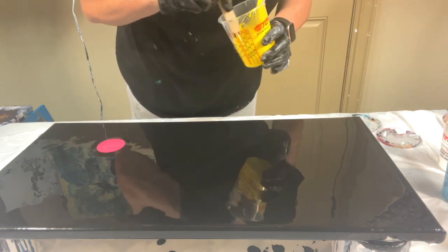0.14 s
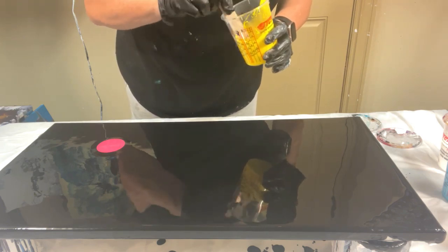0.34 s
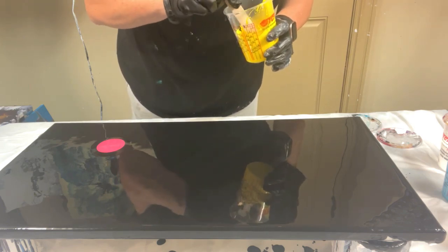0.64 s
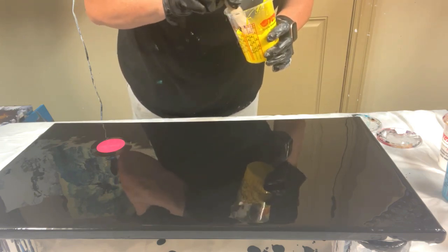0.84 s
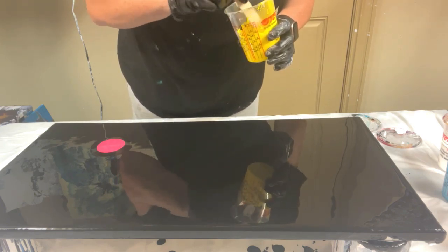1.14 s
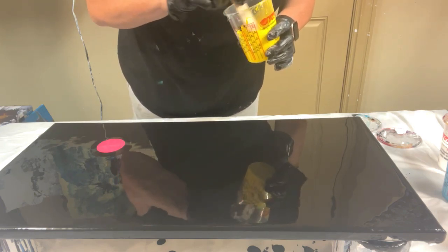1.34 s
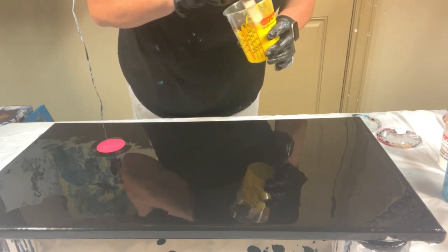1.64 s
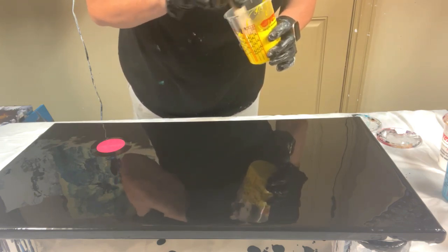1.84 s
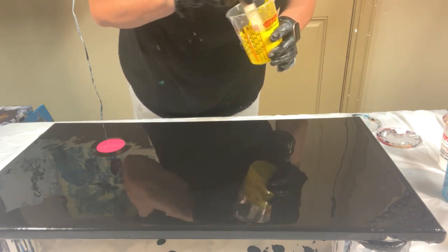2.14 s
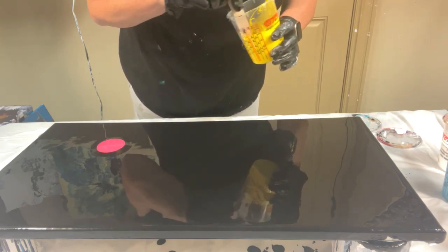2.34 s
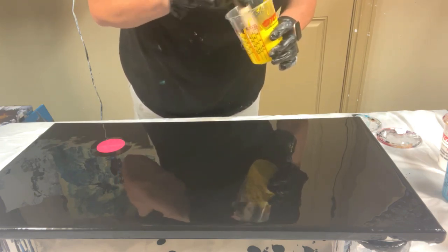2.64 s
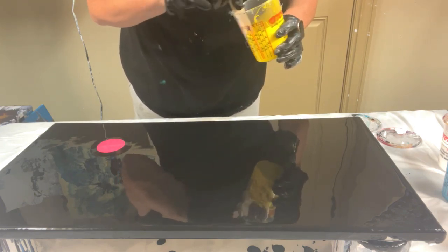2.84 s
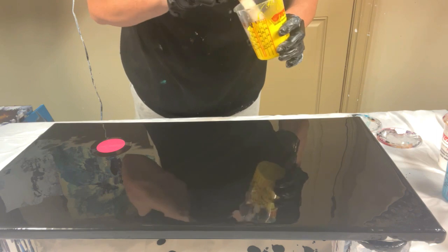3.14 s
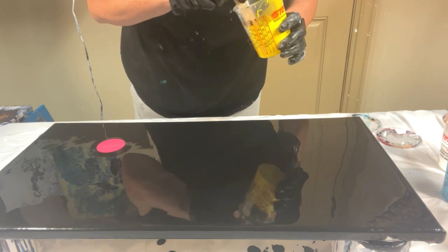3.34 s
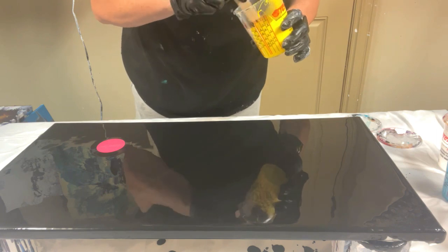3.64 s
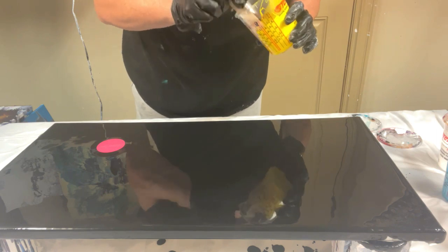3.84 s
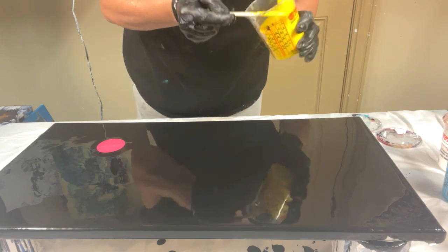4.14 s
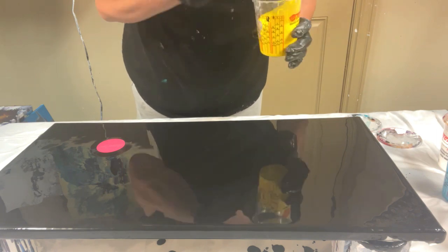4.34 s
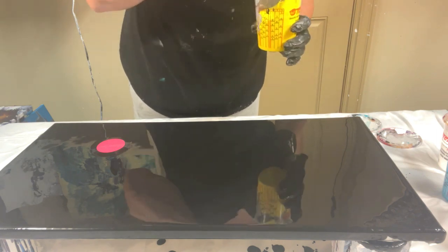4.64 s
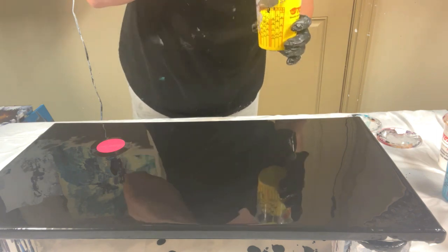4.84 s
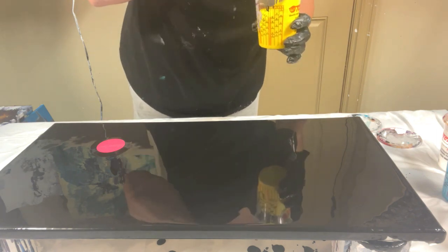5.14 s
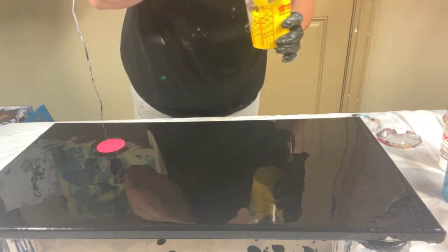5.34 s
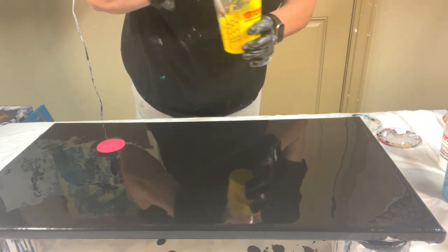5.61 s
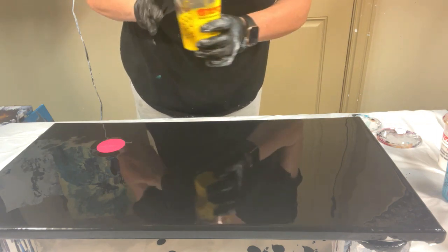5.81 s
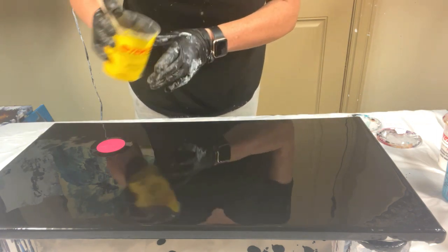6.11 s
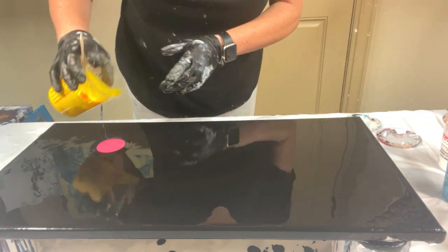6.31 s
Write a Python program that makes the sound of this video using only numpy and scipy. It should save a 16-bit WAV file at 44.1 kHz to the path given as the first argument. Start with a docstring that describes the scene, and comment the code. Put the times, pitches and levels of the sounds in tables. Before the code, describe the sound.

A steady low mains-like hum and deep ventilation rumble, with a faint rush of air stronger on the left, continue throughout. From 0 s a wooden stick stirs thin paint in a hand-held plastic cup, a little left of centre. Light, irregular knocks come a few times a second: damped thuds, a hollow ring and small woody clicks, often doubled by a soft rebound. Faint rubbing, short scrapes and tiny wet crackles fill the gaps. Knocks thin slightly around 2.4 to 3 s, then gather into a firmer, fuller cluster at 3.5 to 3.9 s. A last soft drag comes near 4.2 s, then only hum and air remain. At 5.4 s a scrape and knock resume; at 5.6 s rapid clatter and a bright rim scrape follow, then another scrape and a sharp hollow rattle around 5.9 to 6 s. A small room adds a short bounce and diffuse tail; the treble is softened.

```python
"""Stirring paint in a plastic cup

A wooden stick stirs thin paint in a hand-held cup: knocks ring the cup, stick-slip clicks make the scrapes.
The stick rests for a second, then clatters and scrapes at the rim as the cup changes hands.
Bursting paint films crackle, and a small room echoes it all with a bounce and a tail of fading noise.
Sine tones make a motor hum throughout; shaped noise makes the rumble and hiss of ventilation."""
import sys
import numpy as np
from scipy import signal
from scipy.fft import rfft, irfft
from scipy.io import wavfile
from scipy.ndimage import uniform_filter1d

SR = 44100
rng = np.random.default_rng(int(sys.argv[2]) if len(sys.argv) > 2 else 0)


def store_wav(level_fs):
    """Save 16-bit WAV to argv[1]."""
    pcm = np.round(np.clip(np.atleast_2d(level_fs), -1, 1) * 32767)
    wavfile.write(sys.argv[1], SR, pcm.T.astype(np.int16))


N = 285503
TIME = np.arange(N) / SR
BLOW_TIME = TIME[:SR // 6]  # the time span of one blow

# Firm knocks of the stick; levels are before the trims in knocks(). The hollow's pitch starts at
# hollow_pitch_hz where 880 is its rest; the wall answers best at wall_centre_hz and less to either side.
# [start_s, base_thud_db, hollow_ring_db, hollow_pitch_hz, wall_db, wall_centre_hz,
#  wall_falloff_db_per_octave, tick_db, tick_centre_hz]
STICK_KNOCKS = [(0.2055, -70, -61, 893, -69.5, 2190, 10, -75, 3000),
                (0.302, -64.5, -72, 880, -85, 1400, 18, -90, 3000),
                (0.346, -67, -69.5, 823, -72.5, 2400, 24, -78, 3200),
                (0.5605, -67, -65.5, 884, -69, 1250, 10, -70, 3200),
                (0.6832, -75, -80, 876, -60.5, 2080, 30, -65, 4400),
                (0.694, -64, -66, 890, -59, 2260, 12, -62, 3400),
                (0.795, -66, -79, 880, -75, 1300, 20, -80, 3000),
                (0.84, -72, -69, 850, -86, 2400, 18, -84, 3000),
                (0.9385, -82, -75, 890, -66.5, 2500, 30, -65.5, 3500),
                (1.0128, -69, -60, 900, -62, 1320, 18, -67.5, 4000),
                (1.029, -65, -87, 880, -71, 2880, 19, -64.5, 4700),
                (1.055, -80, -81, 906, -72, 2350, 23, -70, 4700),
                (1.1685, -73, -67.5, 870, -71.5, 2550, 4, -67, 3370),
                (1.2888, -64, -72, 871, -74, 1900, 19, -71, 4500),
                (1.4218, -56.5, -65.5, 906, -66.5, 2630, 23, -62.5, 3730),
                (1.435, -67, -59.5, 900, -67, 2700, 28, -76, 3400),
                (1.463, -78, -78, 875, -76, 2400, 18, -79, 3200),
                (1.4995, -82, -66, 878, -68.5, 2300, 12, -73, 3400),
                (1.693, -72, -68, 889, -58, 2300, 7, -72, 3600),
                (1.701, -76, -58.5, 890, -61.5, 2420, 23, -60, 5000),
                (1.762, -78, -75, 874, -68.5, 2300, 16, -73, 4800),
                (1.8134, -88, -79, 870, -74, 2300, 20, -70, 4540),
                (1.9574, -75, -64, 900, -68, 2300, 20, -69.5, 6500),
                (2.0242, -74, -79, 910, -67.5, 2420, 34, -71, 3600),
                (2.0778, -86, -80, 885, -66, 2450, 39, -69.5, 4000),
                (2.131, -90, -69, 875, -83, 2300, 18, -86, 3500),
                (2.2302, -82, -64.5, 885, -60.5, 2100, 19, -67, 3200),
                (2.2938, -63, -69, 830, -68.5, 2360, 28, -87, 3500),
                (2.5627, -82, -89, 860, -76, 2360, 22, -76, 3500),
                (2.7557, -68, -60.5, 890, -65, 2320, 18, -67.5, 4060),
                (2.945, -80, -69, 845, -82, 2200, 18, -78, 4000),
                (3.0466, -68, -86, 870, -69, 2200, 20, -76, 3200),
                (3.1752, -82, -62.5, 845, -66, 2530, 10, -62, 5100),
                (3.249, -66, -62, 865, -77, 1500, 18, -93, 3000),
                (3.4798, -62, -66, 900, -62, 1780, 19, -60, 3100),
                (3.5218, -63, -65, 881, -64, 1650, 8, -73, 3000),
                (3.5665, -57, -59.5, 883, -62.5, 1580, 18, -69, 3600),
                (3.579, -67, -54.5, 880, -76, 1660, 20, -79, 3600),
                (3.7412, -64.5, -66, 926, -63.5, 1790, 12, -59.5, 3500),
                (3.815, -76, -77, 890, -70, 1610, 25, -70, 4900),
                (3.835, -59, -53.5, 888, -67.5, 1690, 22, -73, 4020),
                (3.848, -58, -53.5, 877, -70, 1640, 27, -73, 4000),
                (3.893, -71, -66, 890, -77, 1410, 18, -72, 4000),
                (3.926, -81, -69, 855, -68, 1380, 30, -72.5, 3600),
                (4.0345, -68.5, -82, 917, -68.5, 1400, 8, -66, 4430),
                (4.0626, -68, -71, 890, -72, 2170, 18, -68.5, 3800),
                (5.4012, -60, -71, 900, -57.5, 1630, 21, -60, 3740),
                (5.434, -65, -77, 880, -65.5, 1950, 20, -70, 3600),
                (5.5148, -69, -62.5, 880, -62, 1880, 27, -65, 3830),
                (5.528, -77, -68, 886, -76, 1900, 18, -78, 3600),
                (5.5655, -65, -75, 870, -64.5, 1400, 15, -79, 3600),
                (5.586, -80, -68, 885, -78, 1500, 8, -77, 3600),
                (5.6222, -80, -86, 880, -74, 2000, 13, -63, 7000),
                (5.6262, -74, -81, 884, -65, 1960, 34, -75, 6700),
                (5.631, -79, -80, 870, -66, 1980, 36, -69, 6300),
                (5.6408, -72, -79, 870, -65, 1980, 33, -69, 6630),
                (5.9435, -79, -76, 870, -67, 2310, 8, -68.5, 3800),
                (5.966, -91, -84, 880, -69, 3000, 17, -65, 5160),
                (5.978, -66.5, -59, 844, -69, 1620, 13, -71, 4000),
                (5.992, -70, -52.5, 881, -59.5, 2150, 11, -56, 6100),
                (6.008, -76, -70, 880, -63, 2200, 14, -67, 3800)]


def knocks(base_trim_db=-1, hollow_trim_db=0., wall_trim_db=0., tick_trim_db=-1):
    """The stick strikes the cup, springs back and touches it once more, softly."""
    out = np.zeros(N)
    # delay in seconds, then change in the hollow and in everything else in dB
    touches = [(0, 0, 0), (.0113, -7, -14.5)]
    for start_s, base, hollow, hollow_hz, wall, wall_hz, falloff_db, tick, tick_hz in STICK_KNOCKS:
        for lag_s, air_db, plastic_db in touches:
            base_db = base + base_trim_db + plastic_db
            hollow_db = hollow + hollow_trim_db + air_db
            wall_db = wall + wall_trim_db + plastic_db
            tick_db = tick + tick_trim_db + plastic_db
            touch_s = start_s + lag_s
            add(out, touch_s, body(base_db, hollow_db, hollow_hz))
            add(out, touch_s, blow(wall_ring(wall_hz, falloff_db), wall_db))
            add(out, touch_s, blow(contact(tick_hz), tick_db))
    return out


# Ways the paint-loaded base can ring, damped by paint and hand; levels are relative.
# [pitch_hz, level_db, time_to_fall_60_db_s]
BASE_MODES = [(313, -6.5, 0.039), (440, 0, 0.019), (545, -3.5, 0.039), (688, 4.5, 0.016),
              (640, -12.5, 0.024)]
# Ways the air in the cup can ring; levels are relative.
# [pitch_hz, level_db, time_to_fall_60_db_s]
HOLLOW_MODES = [(740, -15, .04), (826, -3.5, .06), (875, 3, .026), (893, -5.5, .105), (935, -6, .045),
                (990, -10, .035), (1080, -10, .02)]


def body(base_db, hollow_db, hollow_hz, rest_hz=880, cushion_s=0.003):
    """The paint passes a knock on: the base thuds and the hollow sounds, its pitch bent by the sloshing."""
    cushion = 1 - np.exp(-BLOW_TIME / cushion_s)
    thud = ring(BASE_MODES, scatter_db=2, detune=.03)
    bend = hollow_hz / rest_hz - 1
    air = ring(HOLLOW_MODES, scatter_db=2, detune=.012, signs=[1], bend=bend)
    return blow(cushion * thud, base_db) + blow(cushion * air, hollow_db)


# Ways the thin plastic wall can ring, damped by the hand; levels are relative.
# [pitch_hz, level_db, time_to_fall_60_db_s]
WALL_MODES = [(1083, 9, 0.022), (1241, 7, 0.015), (1435, -3, 0.019), (1702, 1, 0.016), (1808, 0.5, 0.011),
              (1906, 4.5, 0.017), (2033, -1.5, 0.013), (2263, 3, 0.026), (2400, 0, 0.023),
              (2640, -3.5, 0.029), (2800, 2.5, 0.012), (3200, -2, 0.0045), (3470, -12, 0.0061),
              (4030, -4.5, 0.019), (4550, -4, 0.019)]


def wall_ring(centre_hz, falloff_db, press_s=0.00061):
    """The place of contact favours the wall modes around one frequency; the grip flexes and retunes them."""
    modes = [(hz, db - falloff_db * abs(np.log2(hz / centre_hz)), t60) for hz, db, t60 in WALL_MODES]
    press = 1 - np.exp(-BLOW_TIME / press_s)  # the wall yields, so the force builds up
    return press * ring(modes, scatter_db=2, detune=.04)


# Colour of wood touching plastic, with the stick's own resonances; levels are relative.
# [frequency_hz, level_db]
TICK_COLOUR = [(300, -18.5), (1500, 3.5), (3200, 6.5), (4100, -1.5), (4700, 3), (5300, -4), (6000, -6),
               (6600, -2.5), (7400, -4.5), (8300, -6.5), (10000, -11)]


def contact(tick_hz, tick_t60=0.019, crackle_db=-17, crackle_t60=0.069, falloff_db=10):
    """Wood snaps against plastic, then chatters on it in a few fine grains."""
    t = BLOW_TIME
    tone = [(hz, db - falloff_db * abs(np.log2(hz / tick_hz))) for hz, db in TICK_COLOUR]
    moments = 1. * (rng.random(len(t)) < 220 / SR)  # about 220 grains a second
    grains = unit(uniform_filter1d(moments, SR // 1500))
    strength = fade(t, tick_t60) + undb(crackle_db) * grains * fade(t, crackle_t60)
    return colour(rng.standard_normal(len(t)), tone) * strength


def ring(modes, scatter_db, detune, signs=(-1, 1), bend=0, settle_s=0.028):
    """A blow rings fading sines; contact point and moving paint vary their mix, and a bent pitch settles."""
    hz, db, t60 = np.transpose(modes)[:, :, None]
    t = BLOW_TIME
    size, shift = rng.standard_normal((2, len(modes), 1))
    sign = rng.choice(signs, (len(modes), 1))
    bent_time = t + bend * settle_s * (1 - np.exp(-t / settle_s))
    strength = sign * undb(db + scatter_db * size) * fade(t, t60)
    waves = np.sin(2 * np.pi * hz * (1 + detune * shift) * bent_time)
    return np.sum(strength * waves, axis=0)


def blow(x, db):
    """Set the level of a blow over its first hundredth of a second."""
    return x * undb(db) / np.sqrt(np.mean(x[:SR // 100] ** 2))


# Effort of the stick dragging through the paint and along the wall; levels are before trims.
# [start_s, hollow_db, wall_db]
STIR_EFFORT = [(0, -75, -79), (.38, -77, -83.5), (1.41, -79, -79), (2.15, -75, -82.5), (2.45, -74.5, -75),
               (3.4, -79, -84.5), (3.8, -91, -89), (4.14, -68, -70), (4.26, -92, -89)]


def stirring(hollow_trim_db=-4, rub_db=-5, catches_db=-6, uneven_db=3.5, strokes_per_s=8):
    """The wet stick glides along the wall: a faint rub, tiny catches, and a murmur of paint in the hollow."""
    s, hollow, wall = np.transpose(STIR_EFFORT)
    # frequency in Hz, relative level in dB
    hollow_tone = [(600, -7.5), (740, -9.5), (830, 5), (900, 1.5), (1000, -7), (1300, -12.5)]
    wall_tone = [(1600, -18.5), (2000, -6.0), (2330, 0.5), (2700, -9.5), (3600, -7.5), (5000, -9.5)]
    murmur = unit(colour(slips(rate=270, spread_db=0), hollow_tone))
    rub = unit(colour(slips(rate=750, spread_db=4.5), wall_tone))
    catches = unit(colour(slips(rate=35, spread_db=2), wall_tone))

    def effort(db):
        """Follow the table with random unevenness; silent after its last row."""
        return undb(np.interp(TIME, s, db, right=-200) + uneven_db * walk(strokes_per_s))

    on_wall = undb(rub_db) * rub + undb(catches_db) * catches
    return murmur * effort(hollow + hollow_trim_db) + on_wall * effort(wall)


def scraping(rasp_trim_db=-1, wall_trim_db=-1):
    """The stick slides on wall and rim: bright dense slips that also shake the wall."""
    rub = slips(rate=1200, spread_db=4.5)
    # frequency in Hz, relative level in dB
    rasp_tone = [(2500, -23.0), (4200, -6.5), (5400, -8.5), (6800, -3), (8200, -18.0), (11000, -10.5)]
    wall_tone = [(1400, -6.5), (1750, -5.5), (2250, 2), (2650, -5.5), (3300, -12)]
    rasp = unit(colour(rub, rasp_tone)) * rim_pressure(0)
    wall = unit(colour(rub, wall_tone)) * rim_pressure(1)
    return undb(rasp_trim_db) * rasp + undb(wall_trim_db) * wall


# Scrapes along the wall and rim, timed at the hardest pressure; levels are before trims.
# [peak_s, build_up_s, bright_rasp_db, wall_db]
RIM_SCRAPES = [(0.059, 0.0063, -81, -71.5), (.19, 0.068, -84, -74.5), (.503, 0.029, -74.5, -70),
               (1.955, 0.02, -74.5, -71), (2.225, 0.02, -76, -71), (2.55, 0.088, -81, -78),
               (3.045, 0.036, -88, -71), (4.19, 0.086, -84, -76), (5.365, .016, -73, -94),
               (5.61, 0.17, -74.5, -74.5), (5.622, 0.0085, -63, -72), (5.642, 0.017, -55, -75),
               (5.887, 0.013, -67.5, -75), (5.995, 0.004, -61, -62)]


def rim_pressure(column, build_db=12, release_t60=0.011):
    """Each scrape presses harder and harder until the stick slips off."""
    pressure = np.zeros(N)
    for peak_s, rise_s, *db in RIM_SCRAPES:
        before = np.maximum(peak_s - TIME, 0)
        after = np.maximum(TIME - peak_s, 0)
        level_db = db[column] - build_db * (before / rise_s) ** 2 - 60 * after / release_t60
        pressure += undb(np.maximum(level_db, -200))
    return pressure


# Wet paint tearing from the stick after a stroke.
# [start_s, time_to_fall_60_db_s, level_db]
PAINT_TEARS = [(0.714, 0.14, -69.5), (1.052, 0.06, -75), (1.712, 0.23, -76), (3.9, .2, -79)]


def squelches():
    """Tiny films of paint burst in a short bright crackle."""
    tone = [(2500, -18), (4000, -2.5), (4900, -1.0), (5800, 0), (7500, -14.0)]  # Hz, relative dB
    crackle = unit(colour(slips(rate=1500, spread_db=3), tone))
    strength = np.zeros(N)
    for s, t60, db in PAINT_TEARS:
        strength += undb(db) * (TIME >= s) * fade(np.abs(TIME - s), t60)
    return crackle * strength


def slips(rate, spread_db):
    """Stick-slip friction: tiny clicks at random moments, rate a second on average, a few much stronger."""
    moments = rng.random(N) < rate / SR
    signs = rng.choice([-1, 1], N)
    strength_db = spread_db * np.minimum(rng.exponential(size=N), 3)
    return moments * signs * undb(strength_db)


def dull_top(x, edge_hz=7900, order=6):
    """Low-pass filter: the cup sounds dull above the edge frequency, as through a soft microphone."""
    return signal.sosfilt(signal.butter(order, edge_hz, fs=SR, output="sos"), x)


def room(x, direct_left_db=6, echo_left_db=4, bounce_s=0.0091, bounce_db=-10, tail_db=-1.5):
    """Direct sound, one bounce off a near surface and a tail whose pattern changes as the cup moves."""
    turn = 2 * np.pi * TIME  # the hands sway once a second
    tail = reverberate(x * np.cos(turn)) + reverberate(x * np.sin(turn))
    echo = undb(tail_db) * tail + undb(bounce_db) * delay(x, bounce_s)
    return pan(direct_left_db) * x + pan(echo_left_db) * echo


def reverberate(x, room_t60=0.35, build_s=0.005):
    """A short diffuse tail of fading noise, different at each side."""
    t = TIME[:SR // 2]
    tone = [(100, 0.0), (550, -2.5), (870, -8.0), (1300, -3.0), (2400, -4.5), (3800, -3.0),
            (6000, -0.5), (12000, -20.5)]  # Hz, relative dB
    tail = colour(rng.standard_normal((2, len(t))), tone)
    tail *= fade(t, room_t60) * (1 - np.exp(-t / build_s))
    tail /= np.sqrt(np.sum(tail ** 2))
    return signal.fftconvolve(x[None], tail, axes=1)[:, :N]


# Mains hum and motor tones; levels are rms, before wavering and panning.
# [pitch_hz, level_db]
HUM_TONES = [(50.49, -62.9), (53.39, -57.9), (57.77, -66.0), (115.56, -58.4), (120.0, -51.3),
             (221.15, -77.6), (240.0, -75.0), (257.9, -80.2)]


def hum(level_db=0, waver_db=3.04, lag_s=0.00071):
    """Mains and motor tones waver in level; close pairs beat, and all reach the right a little later."""
    tones = np.zeros(N)
    for hz, db in HUM_TONES:
        tones += undb(db + waver_db * walk(3.02)) * np.sin(2 * np.pi * hz * TIME)
    # the root of 2 turns rms into the peak of a sine
    return np.sqrt(2) * undb(level_db) * np.array([tones, delay(tones, lag_s)]) * pan(1.7)


# Colour of the ventilation's deep rumble in the room modes; levels are relative.
# [frequency_hz, level_db]
RUMBLE_COLOUR = [(20, -42.5), (38, -19.5), (45, -21), (52, -6.5), (62, -7.5), (72, 1), (93, -18.5),
                 (106, 1.5), (119, -6.5), (130, -12), (144, -8), (158, -13), (188, -10), (250, -28)]
# Colour of the ventilation's rush of air; levels are relative.
# [frequency_hz, level_db]
AIR_COLOUR = [(250, -2), (320, -9), (450, -10.5), (680, -14.5), (850, -21), (1050, -28), (1250, -23.5),
              (1480, -27.5), (1800, -23.5), (3300, -26), (4600, -26), (6900, -30.5), (8800, -43.5),
              (13000, -44.5)]


def ventilation(rumble_db=-51.0, air_db=-65.0, lag_s=0.001):
    """A deep rumble that reaches the right a little later, under a nearly steady, diffuse rush of air."""
    air = draught(AIR_COLOUR, flutter_db=.35)
    left, right = draught(RUMBLE_COLOUR, flutter_db=1.56)
    rumble = np.array([left, delay(right, lag_s)])
    return undb(rumble_db) * rumble + undb(air_db) * air


# Spread of the ventilation noise: the part that differs between channels against the shared part.
# [frequency_hz, side_over_mid_db]
STEREO_SPREAD = [(60, -21), (120, -9.5), (180, -2.5), (280, -0.5), (600, 2.5), (1500, 1.5), (5000, 0.5),
                 (8000, -2)]
# Extra gain of the ventilation noise in the left channel.
# [frequency_hz, left_gain_db]
LEFT_BOOST = [(60, 1.3), (110, 1.3), (180, 4.5), (300, 3), (520, 1.5), (1550, 3), (2670, 3), (4580, 6.5),
              (8000, 4.5), (11000, 0)]


def draught(points, flutter_db):
    """Noise of moving air, partly shared between the channels and stronger on the left."""
    mid, apart = colour(rng.standard_normal((2, N)), points)
    side = colour(apart, STEREO_SPREAD, skirt_db=0)
    left = colour(mid + side, LEFT_BOOST, skirt_db=0)
    return unit(np.array([left, mid - side])) * undb(flutter_db * walk(4.253))


def undb(db):
    """Decibels to gain."""
    return 10 ** (np.asarray(db) / 20)


def unit(x):
    """Scale to an rms (average strength) of 1."""
    return x / np.sqrt(np.mean(x ** 2))


def pan(left_db):
    """Gains of the two channels that make the left louder by left_db."""
    return undb(np.array([[left_db], [-left_db]]) / 2)


def colour(x, points, skirt_db=40):
    """Shape by a (Hz, dB) spectrum that falls by skirt_db an octave beyond its ends."""
    hz, db = np.transpose(points)
    octave = np.log2(np.maximum(np.fft.rfftfreq(x.shape[-1], 1 / SR), 1))
    outside = np.abs(octave - np.clip(octave, np.log2(hz[0]), np.log2(hz[-1])))
    gain_db = np.interp(octave, np.log2(hz), db) - skirt_db * outside
    return irfft(rfft(x) * undb(gain_db), x.shape[-1])


def walk(rate):
    """Slow chance: random levels held 1 / rate s and smoothed, scaled to an rms of 1."""
    hold = int(SR / rate)
    steps = np.repeat(rng.standard_normal(N // hold + 1), hold)
    return unit(uniform_filter1d(steps, hold)[:N])


def fade(t, t60):
    """Exponential decay by 60 dB in t60 seconds."""
    return np.exp(-np.log(1000) * t / t60)


def add(out, s, sound):
    """Mix a sound in at a time in seconds."""
    start = int(s * SR)
    out[start:start + len(sound)] += sound[:len(out) - start]


def delay(x, seconds):
    """The same sound, later."""
    return np.interp(TIME - seconds, TIME, x, left=0)


def scene():
    """The cup in its room, over hum and ventilation."""
    cup = knocks() + stirring() + squelches() + scraping()
    return room(dull_top(cup)) + hum() + ventilation()


def record(dry, top_hz=13700):
    """The recorder cuts the top: a steep low-pass filter."""
    return signal.sosfilt(signal.ellip(8, .2, 70, top_hz, fs=SR, output="sos"), dry)


dry = scene()
out = record(dry)
store_wav(out)
```